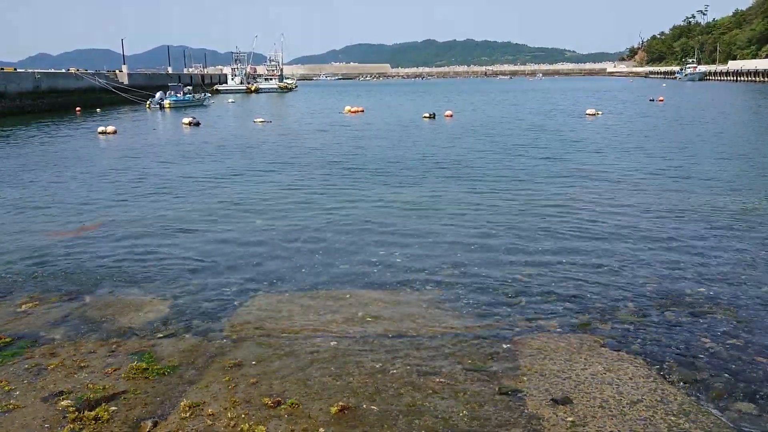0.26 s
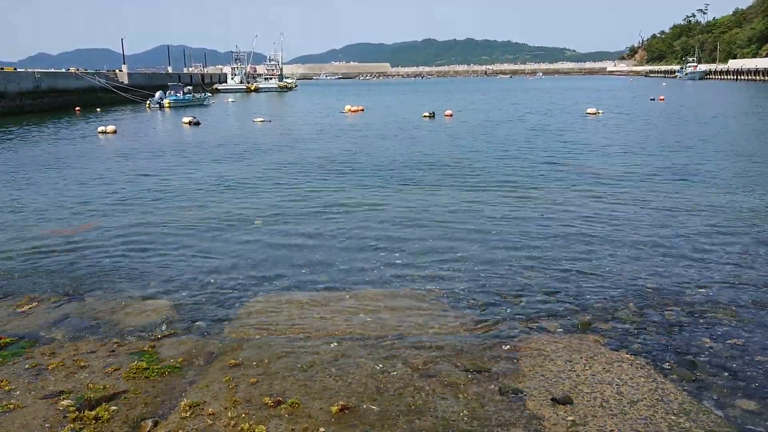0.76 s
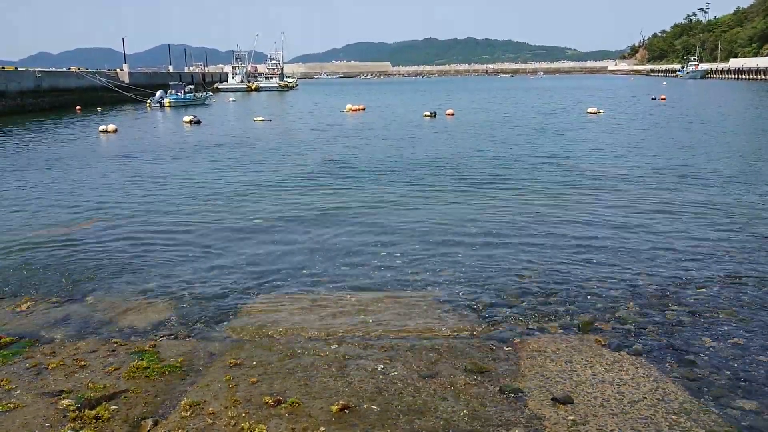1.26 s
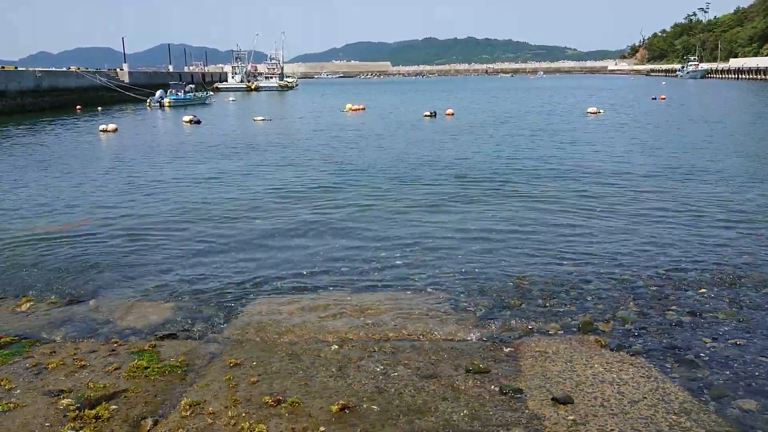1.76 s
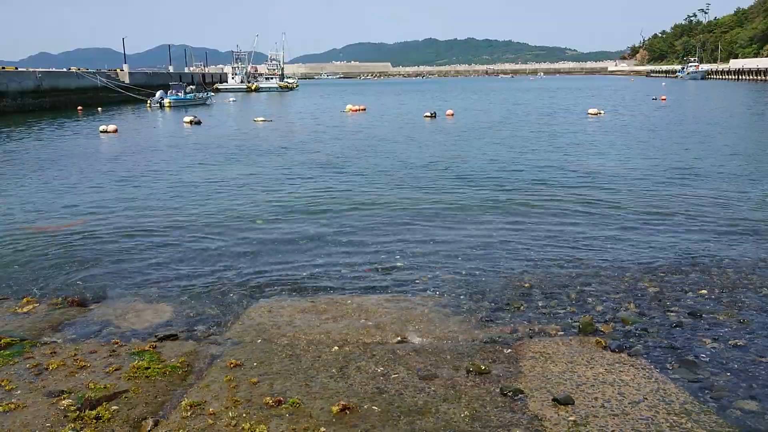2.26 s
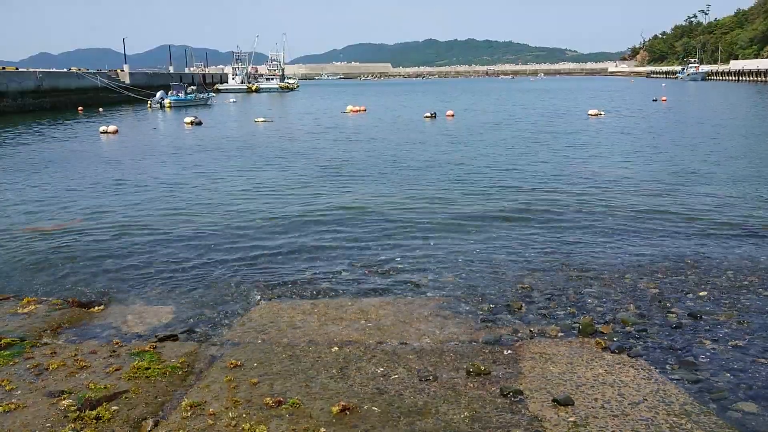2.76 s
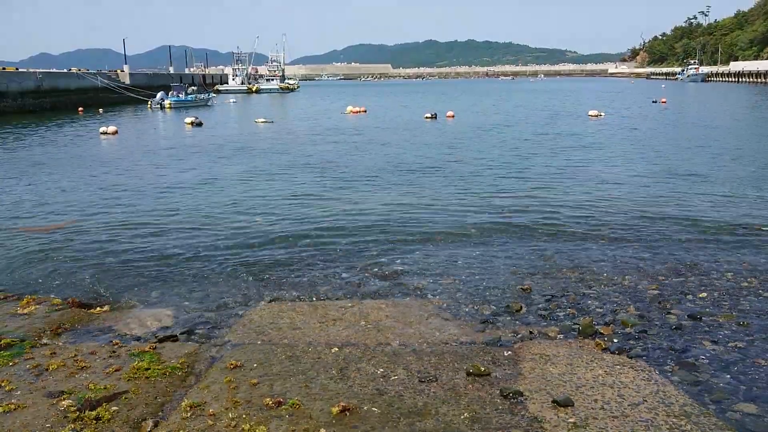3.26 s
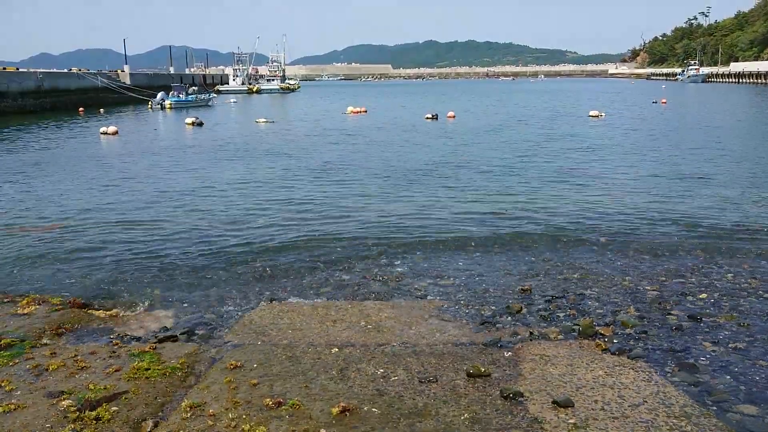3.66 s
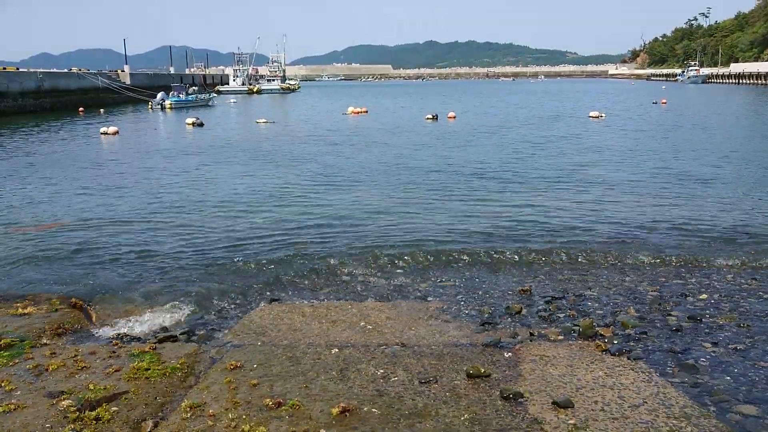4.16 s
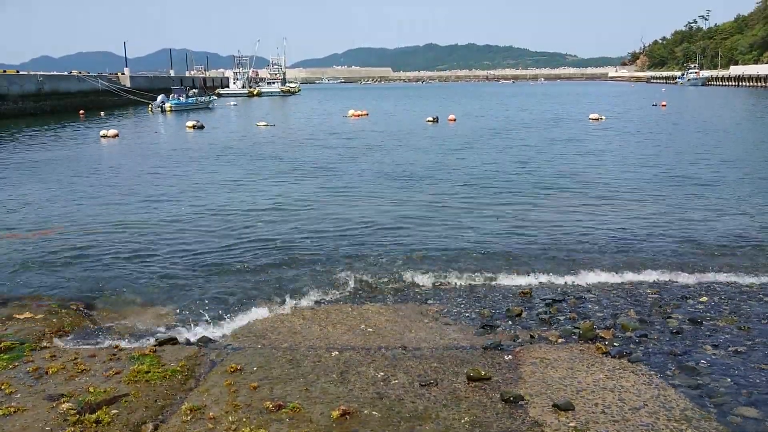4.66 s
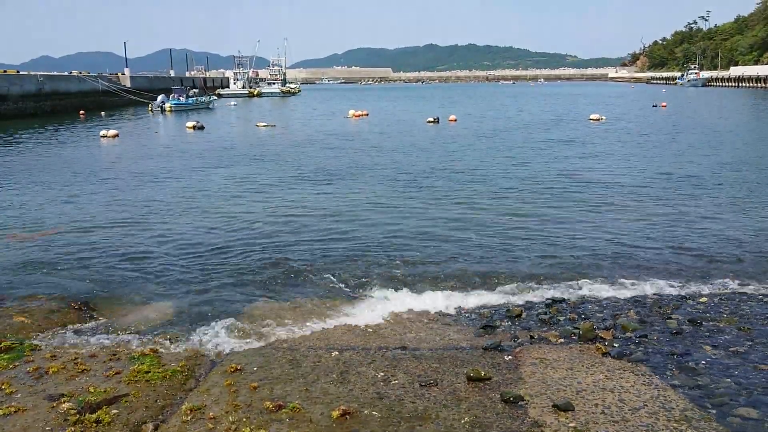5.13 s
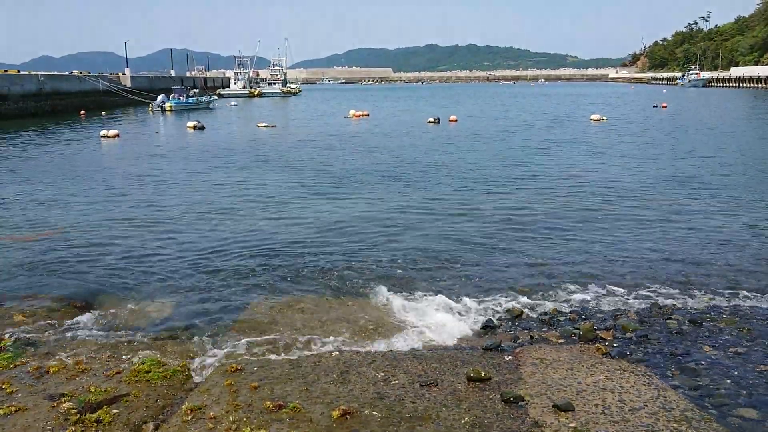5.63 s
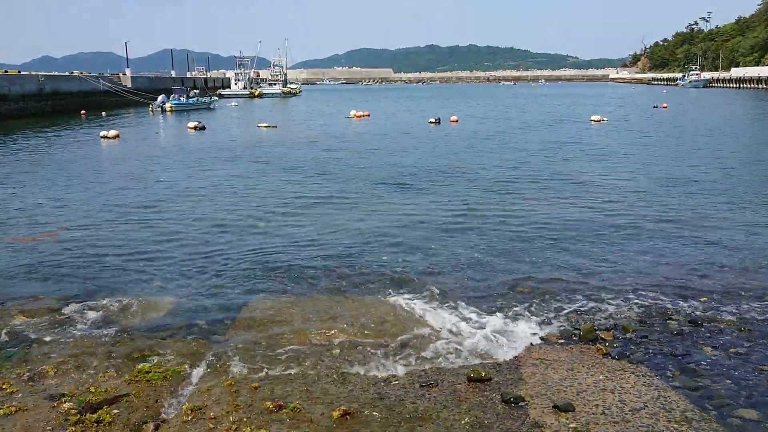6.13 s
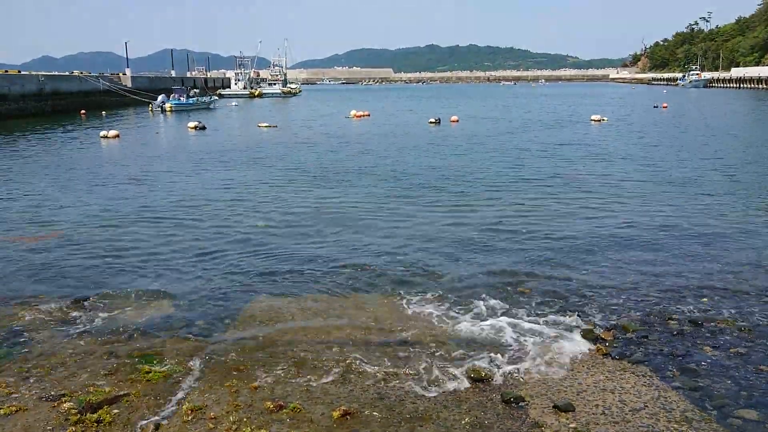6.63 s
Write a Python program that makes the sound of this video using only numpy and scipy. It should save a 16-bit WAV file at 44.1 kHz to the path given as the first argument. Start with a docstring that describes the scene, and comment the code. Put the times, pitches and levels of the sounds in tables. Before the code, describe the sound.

Water trickles gently at the edge of a slipway, with bubbly lapping, small plops and bright ticking drips close by. At first gusts rumble and bump against the microphone, mostly in the left channel. After they calm, one modest wave swells quickly into a broad, bubbly rush, tumbles unevenly, slaps once more against the slipway's side, and drains into thin foam and drips. Open air, dry, no echo.

```python
"""A harbour: shallow water trickles off a concrete slipway; one small wave breaks, washes up it and fizzes out.
Water sounds by bubble resonance: clouds of decaying sines, from big pockets to foam, over smooth noise.
Near plops and runs of lapping bubbles are rising tones, each with a short noisy splash.
Wind is turbulent pressure noise at the two ports of the microphone, with small eddies in the gusts.
Early on, big eddies also buffet the ports as single pushes, the left one harder."""
import sys
import numpy as np
from scipy import signal
from scipy.fft import rfft, irfft, next_fast_len
from scipy.io import wavfile
from scipy.ndimage import uniform_filter1d

SR = 44100
rng = np.random.default_rng(int(sys.argv[2]) if len(sys.argv) > 2 else 0)


def generate_wav(sig):
    """Save sig (samples, or channels by samples) to the path in sys.argv[1] as 16-bit PCM at SR."""
    pcm = np.round(np.clip(np.atleast_2d(sig).T, -1, 1) * 32767).astype(np.int16)
    wavfile.write(sys.argv[1], SR, pcm)


N = 303849

# Wind. Levels are relative: each wind sound adds its own offset.
# spectrum of the breeze's turbulence: (frequency [Hz], relative density [dB per Hz])
BREEZE_COLOUR = [(18, -41), (30, -35), (42, -9), (65, -4), (95, -10), (140, -19.5), (220, -29.5),
                 (400, -53.5), (900, -73)]
# spectrum of the small eddies in hard gusts: (frequency [Hz], relative density [dB per Hz])
GUST_COLOUR = [(18, -55), (32, -30), (50, -12), (110, -1), (190, -1.5), (300, -7), (450, -19), (700, -22.5),
               (1300, -58), (3000, -61)]
# light breeze between gusts: (time [s], left port level [dB], right port level [dB])
BREEZE_LEVELS = [(0, -36, -68), (0.6, -45.5, -47), (1.1, -48, -51), (1.6, -39, -36), (2.4, -51, -46),
                 (2.62, -54.5, -63), (2.85, -44, -53), (3.25, -46.5, -57), (3.65, -38.5, -54),
                 (4.32, -58, -58), (4.5, -48.5, -59), (5.4, -58, -53.5), (6.3, -55.5, -59),
                 (6.89, -54, -59)]
# gusts: (time of peak [s], nominal length [s], left port level [dB], right port level [dB])
GUSTS = [(0.15, 0.16, -25.5, -62), (0.321, 0.14, -33, -31.5), (0.479, 0.1, -25.5, -40),
         (0.61, 0.042, -53, -34.5), (0.689, 0.064, -33, -56), (0.795, 0.048, -45, -29),
         (0.937, 0.056, -37, -33), (1.042, 0.052, -39, -63), (1.273, 0.021, -41, -35),
         (1.378, 0.044, -32, -30.5), (1.525, 0.086, -41, -28.5), (1.587, 0.052, -23.5, -30),
         (1.684, 0.084, -21.5, -33), (1.775, 0.068, -23, -25), (1.87, 0.065, -33, -24),
         (1.923, 0.044, -15, -45), (2.016, 0.2, -38, -55), (2.178, 0.06, -36.5, -40.5),
         (2.263, 0.022, -57, -29), (2.345, 0.06, -46, -35.5), (3.093, 0.044, -36, -52),
         (3.979, 0.054, -38, -56), (4.137, 0.071, -42, -63), (4.85, 0.103, -43, -50),
         (5.162, 0.06, -60, -43.5), (5.727, 0.08, -55, -42.5), (5.964, 0.054, -55, -47.5),
         (6.81, 0.076, -44, -66)]
GUST_FALL_SHARE = 0.9  # a gust's dying away, as a share of its swelling time
# big eddies on a port: (time [s], level before bass cut [dB], width at half height [s], port [0 left, 1 right])
BUFFETS = [(0.019, -14.5, 0.0029, 0), (0.093, -10.5, 0.0014, 0), (0.147, -11.5, 0.0015, 0),
           (0.215, -16, 0.0021, 0), (0.27, -23.5, 0.0013, 1), (0.314, -16, 0.0021, 0),
           (0.439, -11, 0.0021, 0), (0.492, -7.5, 0.0019, 0), (0.515, -15, 0.0015, 0),
           (0.762, -19, 0.0022, 1), (1.202, -22, 0.0022, 1), (1.354, -16.5, 0.0031, 1),
           (1.379, -15, 0.0026, 1), (1.474, -11.5, 0.0035, 0), (1.595, -7, 0.0024, 0),
           (1.638, -12.5, 0.0011, 0), (1.664, -6.5, 0.0015, 0), (1.711, -13.5, 0.0011, 0),
           (1.763, -11.5, 0.001, 0), (1.772, -6, 0.0016, 0), (1.789, -11.5, 0.00058, 1),
           (1.832, -12, 0.0013, 1), (1.857, -13.5, 0.0013, 1), (1.914, -6.5, 0.0011, 0),
           (1.943, -5.5, 0.0027, 0), (2.012, -18, 0.002, 1), (2.356, -25.5, 0.0018, 1)]

# Water. Levels are relative: each layer adds its own offset.
# spectra of the water's layers: (frequency [Hz], relative density [dB per Hz])
PLUNGE_COLOUR = [(90, -18), (125, -8.5), (165, -2.5), (205, 2.5), (260, -9.5), (360, -25.5)]
SLOSH_COLOUR = [(150, -17), (215, -6.5), (265, 3), (325, -5.5), (400, -7.5), (480, -3.5), (570, 2),
                (720, -1.5), (900, -4.5), (1300, -31)]
GURGLE_COLOUR = [(330, -24), (440, -12.5), (530, -3.5), (620, 0.5), (780, -1), (950, 2.5), (1100, 0),
                 (1500, 3.5), (1850, 2.5), (2250, 3.5), (2700, -0.5), (3200, -5), (4500, -30)]
SPRAY_COLOUR = [(2000, -6), (2900, -3.5), (3300, 1.5), (3850, 2.5), (4500, 1.5), (5350, 1.5), (6050, 1.5),
                (6700, 0.5), (7700, 0), (9000, -4.5), (10500, -7), (12500, -10)]
FIZZ_COLOUR = [(8000, -13), (10500, -2), (11800, -7.5), (13000, 6.5), (14500, 0), (16000, 2)]
# correlation of the wash at the two ports: (frequency [Hz], correlation [-1 to 1])
LIKENESS = [(60, 0.39), (160, 0.48), (270, 1), (450, 0.79), (740, 0.99), (1220, 0.19), (1700, -0.02),
            (2250, -0.028), (3100, -0.3), (4200, 0.073), (9080, 0.041), (15000, 0.29)]
# lean of the water to the left: (frequency [Hz], left minus right level [dB])
LEAN = [(100, 4), (160, 0.5), (270, 4), (450, 3), (740, 2.5), (1220, 1.2), (2010, 0.1), (3200, 2),
        (4200, 0.5), (5850, 6.5), (6900, 2.5), (9500, 7), (13500, 0.5), (15500, 5)]
# path difference of the water: (time [s], lead of the left port [ms])
BEARING = [(0, 0.41), (1.4, 0.34), (2.3, 0.076), (4.1, 0.1), (4.8, -0.05), (6.89, -0.081)]
# trickling and lapping at the slipway's edge: (time [s], gurgle level [dB], spray level [dB], fizz level [dB])
TRICKLE = [(0, -49, -59.5, -63), (0.22, -47.5, -52.5, -59), (0.36, -51, -57, -68),
           (0.9, -55.5, -59.5, -64.5), (1.35, -54, -57.5, -67.5), (2.0, -48, -53, -69),
           (2.45, -47.5, -50.5, -65), (3.35, -49.5, -54.5, -68), (3.65, -47.5, -51.5, -60),
           (4.2, -50, -55, -62), (6.6, -54, -66.5, -63), (6.78, -43.5, -52.5, -59.5)]
PLUNGE_CALM_DB, SLOSH_CALM_DB = -24, -24  # big bubbles in the trickle, relative to its gurgle
# clear plops and drips close by: (time [s], nominal pitch [Hz], level [dB], t60 [s], left minus right level [dB])
PLOPS = [(0.028, 3100, -30, 0.0065, 13), (0.244, 1970, -34.5, 0.05, -3), (0.294, 5830, -33, 0.0095, 14),
         (0.767, 1105, -40, 0.053, 3), (1.215, 1580, -43, 0.089, -4), (1.369, 940, -40, 0.05, 0),
         (1.994, 1600, -32, 0.033, -1), (2.182, 2720, -40, 0.025, -5), (2.435, 1510, -36.5, 0.047, 3),
         (2.523, 855, -42, 0.058, 2), (2.636, 5300, -34, 0.0077, 12), (2.779, 1130, -35.5, 0.024, -2),
         (2.9, 745, -39, 0.034, 2), (3.004, 890, -40.5, 0.062, 2), (3.232, 2190, -29, 0.026, 3),
         (3.284, 776, -43, 0.059, 2), (3.486, 1570, -30.5, 0.023, 4), (3.735, 8600, -32, 0.005, 13),
         (3.81, 8800, -37.5, 0.0069, 16), (3.893, 950, -31.5, 0.032, 0), (3.973, 7900, -30, 0.0052, 12),
         (4.328, 8300, -28, 0.005, 12), (4.383, 10400, -25, 0.0046, 10), (4.509, 644, -29, 0.05, 2),
         (4.616, 5800, -33, 0.03, 19), (4.747, 1250, -25, 0.033, 2), (5.347, 7640, -29, 0.013, 10),
         (5.387, 2630, -25, 0.012, -3), (5.616, 5600, -34, 0.016, 9), (5.901, 6460, -32, 0.01, 12),
         (6.271, 583, -33.5, 0.045, 1), (6.282, 1334, -31, 0.022, 1), (6.389, 302, -43, 0.073, 7),
         (6.425, 6900, -28, 0.012, 3), (6.699, 1500, -37, 0.02, 1), (6.713, 2250, -18, 0.01, 0),
         (6.738, 2730, -35, 0.02, -3), (6.757, 337, -41.5, 0.15, 1), (6.778, 935, -41, 0.04, -4),
         (6.803, 1640, -30.5, 0.024, 2), (6.814, 520, -32.5, 0.058, -1)]
# the wave breaks, then its end piles up against the slipway's side: (time [s], strength [dB])
BREAKS = [(4.8, 0), (5.878, -13)]
# response of each layer to a break:
# (level [dB], rise [dB/s], full before break [s], full after break [s], fall to half amplitude [s])
PLUNGE_SWELL = (-44.5, 38, 0.22, 0.33, 0.03)
SLOSH_SWELL = (-41, 19.5, 0.04, 0.34, 0.31)
GURGLE_SWELL = (-33, 24, 0.0462, 0.21, 0.47)
SPRAY_SWELL = (-37, 25.5, 0.1457, 0.2455, 0.435)
FIZZ_SWELL = (-49, 28, 0.28, 0.16, 0.5)
# lumps of the crest topple one after another: (time [s], lift before layer shares [dB])
TOPPLES = [(4.6, 1.5), (4.87, 3), (5.06, 1.65), (5.35, 1.87), (5.52, 1.88), (5.919, 1.5), (6.27, 1)]
TOPPLE_S = 0.05  # time from the peak of a surge to 1/e of its lift
# share of that lift in each layer: (gurgle [ratio], spray [ratio], fizz [ratio])
TOPPLE_SHARES = (0.8, 0.62, 1)

CUTOFF_HZ = 15750
BLOCK = 32  # samples per step of the slow controls
TIME = np.arange(N) / SR
FFT_SIZE = next_fast_len(N + 4096)
FREQS = np.maximum(np.arange(FFT_SIZE // 2 + 1) * SR / FFT_SIZE, 1)


def from_db(db):
    """Logarithmic level: decibels to amplitude gain."""
    return 10 ** (np.asarray(db) / 20)


def together(*levels_db):
    """Incoherent addition: the powers of unrelated sounds add."""
    return 10 * np.log10(sum(from_db(db) ** 2 for db in levels_db) + 1e-20)


def rms_one(x):
    """Normalisation of power: scale to unit rms."""
    return x / np.sqrt(np.mean(x ** 2) + 1e-20)


def in_time(rows):
    """Linear interpolation: each column of a table at every sample."""
    s, *columns = np.transpose(rows)
    return [np.interp(TIME, s, column) for column in columns]


def at_hz(points, hz):
    """Logarithmic frequency scale: interpolate a table along it."""
    table = np.array(points)
    return np.interp(np.log(hz), np.log(table[:, 0]), table[:, 1])


def panned(lean_db):
    """Interaural level difference: split it evenly into left and right gains."""
    return from_db(np.array([[.5], [-.5]]) * lean_db)


def coloured(x, colour, lean_db=0):
    """Linear filtering: shape spectrum and lean by multiplication in frequency, to rms 1."""
    gain = from_db(at_hz(colour, FREQS)) * panned(lean_db)
    spectrum = rfft(x, FFT_SIZE) * gain
    return rms_one(irfft(spectrum, FFT_SIZE)[:, :N])


def births(per_s):
    """Poisson process: random sample numbers at a rate given per block."""
    blocks = np.repeat(np.arange(len(per_s)), rng.poisson(per_s * BLOCK / SR))
    return blocks * BLOCK + rng.integers(0, BLOCK, len(blocks))


def drift(rate):
    """Low-pass random process: smooth chance of rms 1 per block, with its corner at rate [Hz]."""
    pole, run_in = np.exp(-2 * np.pi * BLOCK * rate / SR), 1000
    chance = rng.standard_normal(N // BLOCK + run_in)
    smooth = signal.lfilter([1], [1, -2 * pole, pole * pole], chance)
    return rms_one(smooth[run_in:])


def turbulence(even_s=0.048):
    """Turbulent pressure: noise unrelated at the two ports, its slow swells evened out."""
    x = coloured(rng.standard_normal((2, N)), BREEZE_COLOUR)
    power = uniform_filter1d(x ** 2, max(int(even_s * SR), 2))
    return x / np.sqrt(power + 0.0076)


def eddies(per_s=130, size_db=2.0):
    """Random vortex passage: small eddies pass each port as irregular puffs."""
    puffs = np.zeros((2, N))
    for port in puffs:
        at = births(np.full(N // BLOCK, per_s))
        size = from_db(size_db * np.minimum(rng.exponential(1, len(at)), 3.0))
        port[at] = size * rng.choice([-1, 1], len(at))
    return coloured(puffs, GUST_COLOUR)


def wind_level():
    """Superposed flow: gusts with bell-shaped amplitude add in power to the breeze at each port."""
    levels_db = [np.array(in_time(BREEZE_LEVELS))]
    for s, length, left_db, right_db in GUSTS:
        away = 2 * (TIME - s) / (length * np.where(TIME > s, GUST_FALL_SHARE, 1))
        drop_db = np.minimum(6 * away ** 2, 80)
        levels_db.append(np.array([[left_db], [right_db]]) - drop_db)
    return together(*levels_db)


def wind(rumble_db=3.35, gust_db=-5.0, hard_db=-24.5, steepness=0.77):
    """Wind noise at the ports: a low rumble, with stronger, higher-pitched eddies in harder gusts."""
    level_db = wind_level()
    eddies_db = gust_db + steepness * np.minimum(level_db - hard_db, 0)
    return from_db(level_db) * (from_db(rumble_db) * turbulence() + from_db(eddies_db) * eddies())


def buffets(level_db=2.5, bass_cut_hz=48):
    """Pressure impulse: a big eddy gives one bell-shaped push; the microphone's bass cut swings it back."""
    out = np.zeros((2, N))
    for s, peak_db, width, port in BUFFETS:
        near = slice(*np.searchsorted(TIME, [s - 2 * width, s + 2 * width]))
        push = .5 ** ((2 * (TIME[near] - s) / width) ** 2)
        out[int(port > .5), near] += rng.choice([-1, 1]) * from_db(peak_db + level_db) * push
    bass_cut = signal.butter(2, bass_cut_hz, "high", fs=SR, output="sos")
    return signal.sosfilt(bass_cut, out + 1e-18)


def plops(rows, rise, splash_db, level_db, swell_cycles=0.27):
    """Bubble resonance near a surface: a pinched-off bubble rings with rising pitch and a short splash."""
    out, t = np.zeros((2, N + SR)), np.arange(SR // 10) / SR
    for s, hz, peak_db, t60, lean_db in rows:
        pitch = hz * (1 + rise * (np.minimum(t / t60, 1) - .3))
        phase = 2 * np.pi * np.cumsum(pitch) / SR
        # the splash is a tone so unsteady that it spreads into a band of noise
        smoothing = signal.butter(2, .15 * hz, fs=SR, output="sos")
        unsteady = rms_one(signal.sosfilt(smoothing, rng.standard_normal((2, len(t)))))
        splash = from_db(splash_db - 45 * t / t60) * unsteady * np.cos(phase)
        swell = 1 - np.exp(-(t * hz / swell_cycles) ** 2)
        sound = (np.sin(phase) * from_db(-60 * t / t60) + splash) * swell
        at = max(round(s * SR), 0)
        out[:, at:at + len(t)] += from_db(peak_db + level_db) * panned(lean_db) * sound
    return out[:, :N]


def laps(count=48, size=3, above_db=0.5, spread_db=5.0, cycles=50, gap_s=.02, climb=1.12,
         low_hz=680, high_hz=2300):
    """Inverse size-pitch law: each lap lets off a run of ever smaller, higher bubbles; rows like PLOPS."""
    when, pitch, strength, side = rng.random((count, 4)).T[:, :, None]
    step = np.cumsum(rng.uniform(.4, 1.6, (count, size)), axis=1) - 1
    s = np.clip(when * N / SR + gap_s * step, 0, N / SR)
    hz = low_hz * (high_hz / low_hz) ** pitch * climb ** step
    calm_db = np.interp(s, *np.transpose(TRICKLE)[:2])
    peak_db = calm_db + above_db + spread_db * strength - step
    columns = np.broadcast_arrays(s, hz, peak_db, cycles / hz, 10 * (side - .4))
    return np.stack(columns, axis=-1).reshape(count * size, -1)


def ring(clicks, hz, t60):
    """Damped resonance: a unit click sets a decaying sinusoid of initial height 1 ringing."""
    r, w = from_db(-60 / (t60 * SR)), 2 * np.pi * hz / SR
    return signal.lfilter([1, -r * np.cos(w)], [1, -2 * r * np.cos(w), r * r], clicks + 1e-18)


def bubbles(low_hz, high_hz, per_s, cycles, size_db, clump_db, count, lag_s=.00018, scatter_db=0.5):
    """Bubble cloud: resonances of many pitches start in clumps, each with its own lag and lean."""
    out, splash = np.zeros((2, N)), drift(22)
    for hz in np.geomspace(low_hz, min(high_hz, .4 * SR), count):
        clumping = from_db(clump_db * (.5 * splash + drift(14)))
        born = births(per_s[::BLOCK][:len(splash)] / count * clumping)
        size = from_db(size_db * np.minimum(rng.exponential(1, len(born)), 4.0))
        size = size * rng.choice([-1, 1], len(born))
        lag, lean = rng.standard_normal((2, len(born)))
        # these weights keep the level even as the rate varies and the spectrum flat
        sides = size * hz / np.sqrt(per_s[born]) * panned(scatter_db * lean)
        clicks = np.zeros((2, N))
        clicks[0, born] = sides[0]
        clicks[1, np.clip(born + np.round(lag * lag_s * SR).astype(int), 0, N - 1)] = sides[1]
        out += ring(clicks, hz, cycles / hz)
    return rms_one(out)


def wash(flutter_db):
    """Central limit: countless far bubbles merge into noise, its port correlation set by frequency."""
    mid, side = rfft(rng.standard_normal((2, FFT_SIZE)))
    alike = np.clip(at_hz(LIKENESS, FREQS), -.99, .99)
    pair = np.sqrt(1 + alike) * mid + np.sqrt(1 - alike) * side * [[1], [-1]]
    flutter = from_db(flutter_db * drift(24))
    return irfft(pair, FFT_SIZE)[:, :N] * np.interp(np.arange(N) / BLOCK, np.arange(len(flutter)), flutter)


def water_layer(level_db, grains, colour, wash_db, flutter_db):
    """Incoherent mixture: near bubbles and their wash share one colour, weighted by total power."""
    lean_db = at_hz(LEAN, FREQS)
    near = coloured(grains, colour, lean_db)
    far = coloured(wash(flutter_db), colour, lean_db)
    mix = near + from_db(wash_db) * far
    return from_db(level_db) * mix / np.sqrt(1 + from_db(2 * wash_db))


def breaker(swell):
    """Growth and decay of a breaker: level builds, holds as the crest tumbles, then falls ever more slowly."""
    peak_db, rise_db_per_s, lead_s, hold_s, half_s = swell
    levels_db = []
    for s, strength_db in BREAKS:
        build_db = rise_db_per_s * np.maximum(s - lead_s - TIME, 0)
        fall_db = 20 * np.log10(1 + np.maximum(TIME - s - hold_s, 0) / half_s)
        levels_db.append(peak_db + strength_db - build_db - fall_db)
    return together(*levels_db)


def topples():
    """Transient excitation: bell-shaped extra level [dB] while a lump of the crest falls."""
    return sum(db * np.exp(-((TIME - s) / TOPPLE_S) ** 2) for s, db in TOPPLES)


def water():
    """Bubble size sets pitch and flow sets birth rate: big under the crest, middling gurgling, tiny in foam."""
    calm_gurgle_db, calm_spray_db, calm_fizz_db = in_time(TRICKLE)
    plunge_db = together(calm_gurgle_db + PLUNGE_CALM_DB, breaker(PLUNGE_SWELL))
    slosh_db = together(calm_gurgle_db + SLOSH_CALM_DB, breaker(SLOSH_SWELL))
    gurgle_lift_db, spray_lift_db, fizz_lift_db = np.outer(TOPPLE_SHARES, topples())
    gurgle_db = together(calm_gurgle_db, breaker(GURGLE_SWELL) + gurgle_lift_db)
    spray_db = together(calm_spray_db, breaker(SPRAY_SWELL) + spray_lift_db)
    fizz_db = together(calm_fizz_db, breaker(FIZZ_SWELL) + fizz_lift_db)
    surge_db = gurgle_db - gurgle_db.max()
    flow = from_db(1.3 * surge_db)
    pockets = bubbles(141.6, 263, 400 * flow, cycles=17, size_db=1.5, clump_db=1.5, count=4)
    big = bubbles(240, 930, 1600 * flow, cycles=25, size_db=1.5, clump_db=2.5, count=9)
    middling = bubbles(503.5, 3158, 7000 * flow, cycles=42, size_db=2.5, clump_db=4.0, count=19)
    drops = bubbles(2840, 11600, 14000 * flow, cycles=31, size_db=4.0, clump_db=3.0, count=12)
    foam = bubbles(10000, 15500, 14000 * flow, cycles=20, size_db=4.6, clump_db=3.2, count=4)
    # single bubbles stand out a little more in calm water; in the breaker they merge into a rush
    rush_db = 1.5 + 0.029 * surge_db
    fizz = water_layer(fizz_db, foam, FIZZ_COLOUR, wash_db=2.0, flutter_db=.8)
    return (water_layer(plunge_db, pockets, PLUNGE_COLOUR, wash_db=-0.5, flutter_db=6.5)
            + water_layer(slosh_db, big, SLOSH_COLOUR, wash_db=-3.5, flutter_db=-0.7)
            + water_layer(gurgle_db - 1.5, middling, GURGLE_COLOUR, wash_db=rush_db, flutter_db=0.9)
            + water_layer(spray_db + 0.5, drops, SPRAY_COLOUR, wash_db=1.5, flutter_db=1.8)
            + from_db(-0.5) * fizz)


def from_bearing(sound):
    """Arrival-time difference: water off to one side reaches the farther port a little later."""
    lead_ms, = in_time(BEARING)
    lead = np.round(lead_ms * SR / 1000).astype(int)
    late = np.clip(np.arange(N) - lead, 0, N - 1)
    return np.array([sound[0], sound[1, late]])


def scene():
    """Superposition in the open air: water from its bearing, with wind right on the microphone."""
    near = plops(PLOPS, rise=0.076, splash_db=-4.5, level_db=-2.5)
    lapping = plops(laps(), rise=.13, splash_db=-11.0, level_db=1.0)
    return from_bearing(water() + near + lapping) + wind() + buffets()


def record(dry):
    """Band limiting: the deepest bass and the top are cut steeply."""
    bass_cut = signal.butter(8, 37, "high", fs=SR, output="sos")
    top_cut = signal.ellip(12, .1, 80, CUTOFF_HZ, fs=SR, output="sos")
    return signal.sosfilt(top_cut, signal.sosfilt(bass_cut, dry))


dry = scene()
out = record(dry)
generate_wav(out)
```